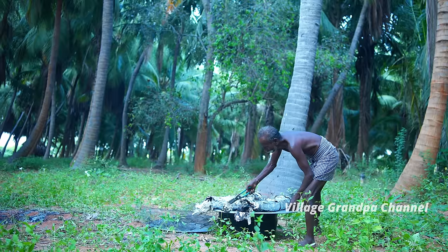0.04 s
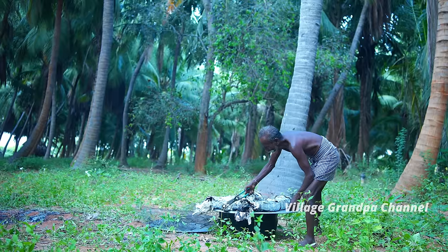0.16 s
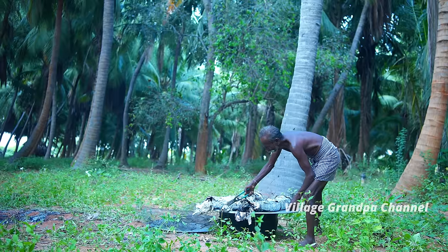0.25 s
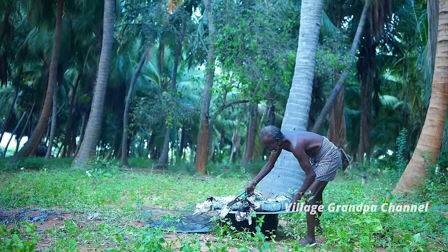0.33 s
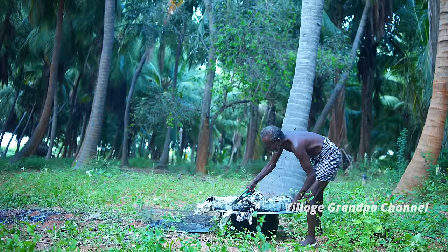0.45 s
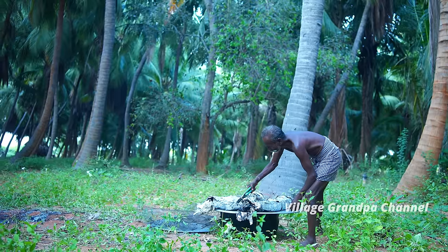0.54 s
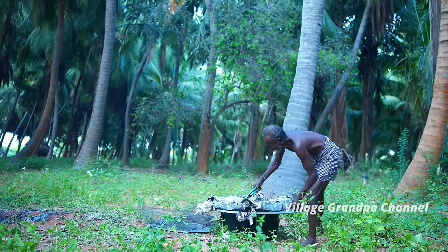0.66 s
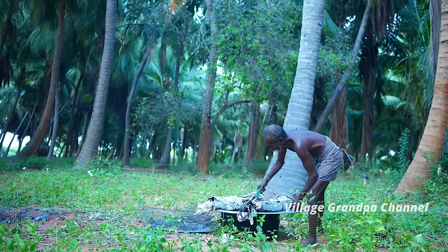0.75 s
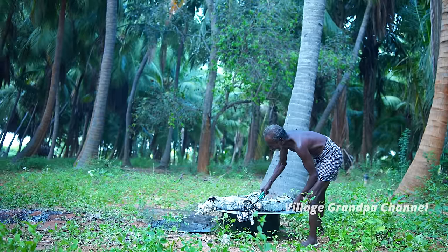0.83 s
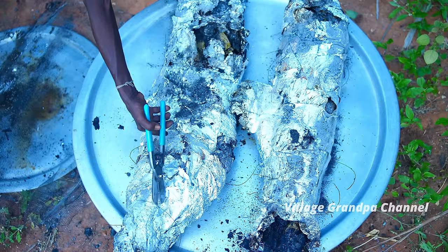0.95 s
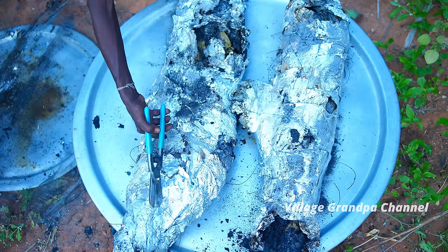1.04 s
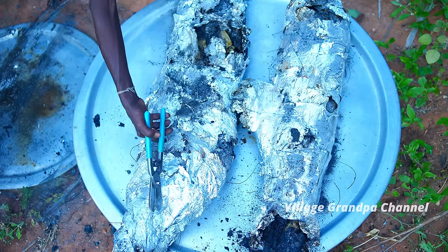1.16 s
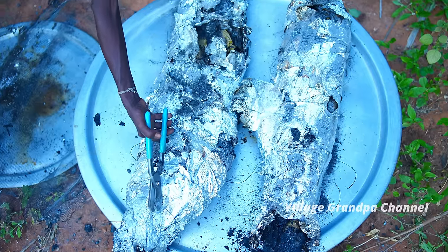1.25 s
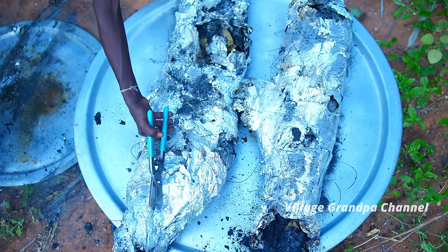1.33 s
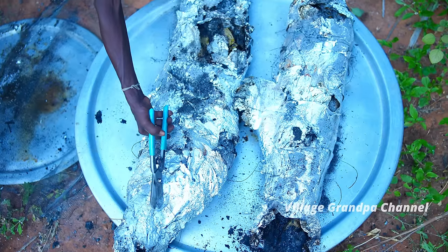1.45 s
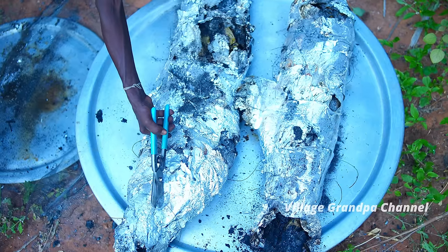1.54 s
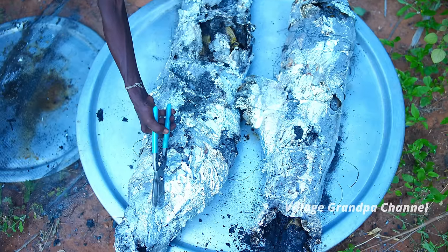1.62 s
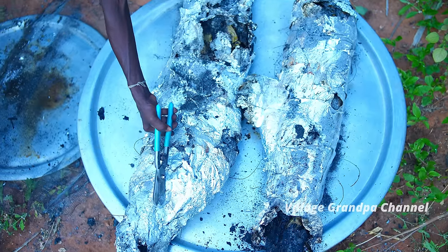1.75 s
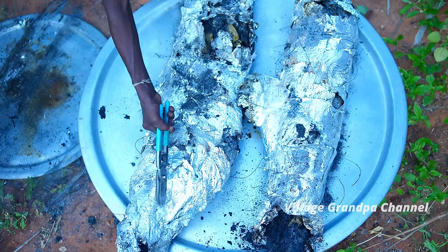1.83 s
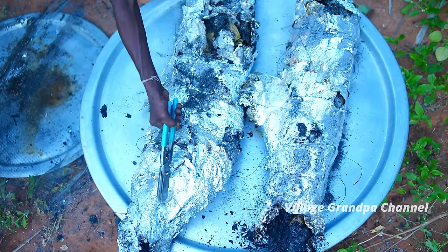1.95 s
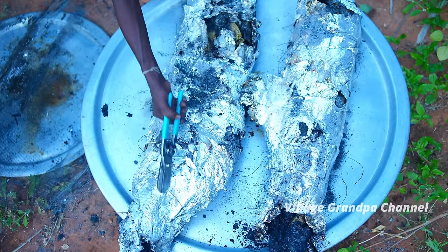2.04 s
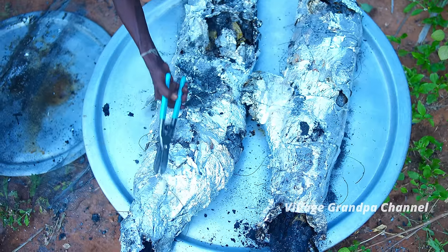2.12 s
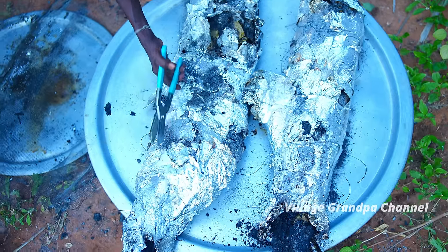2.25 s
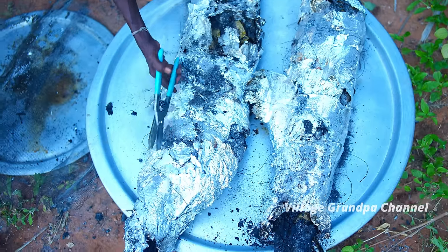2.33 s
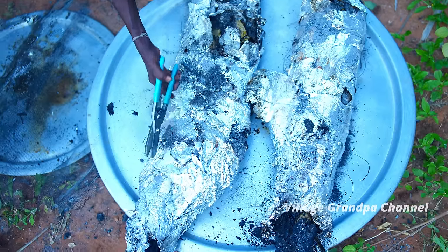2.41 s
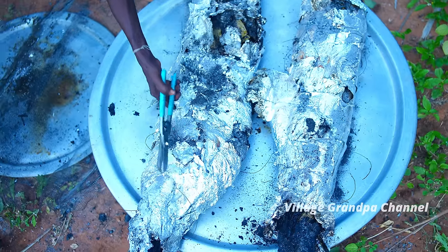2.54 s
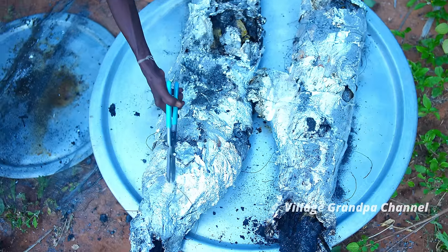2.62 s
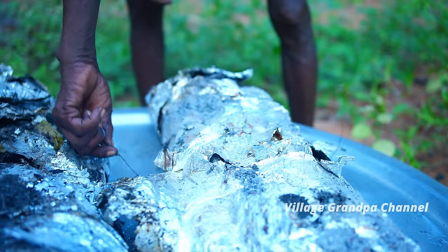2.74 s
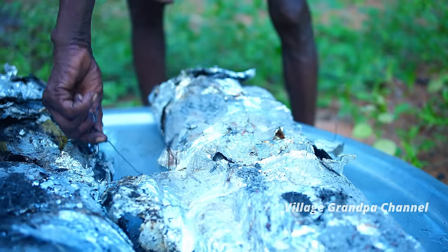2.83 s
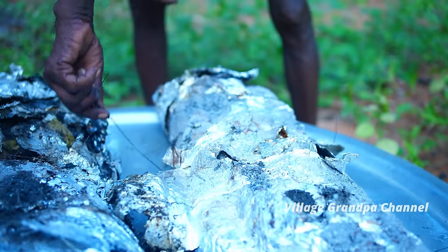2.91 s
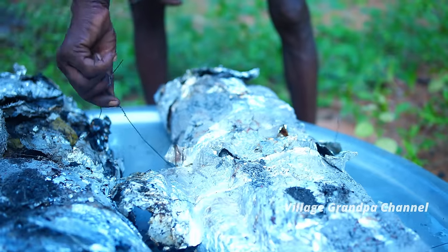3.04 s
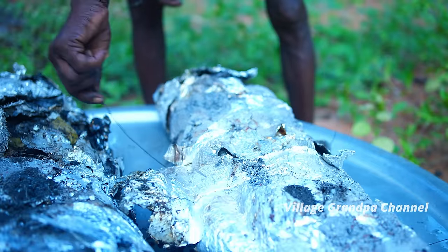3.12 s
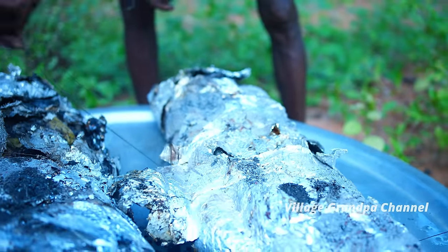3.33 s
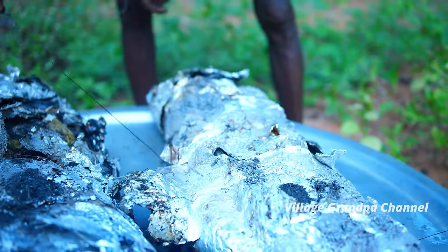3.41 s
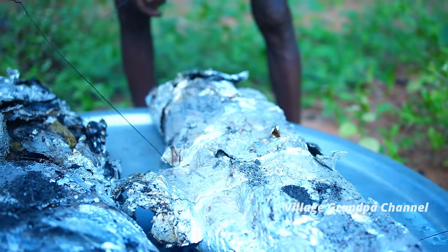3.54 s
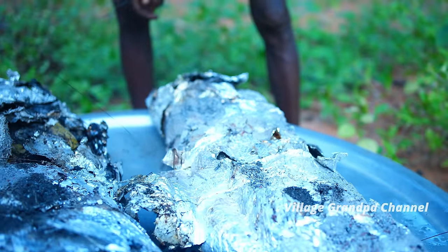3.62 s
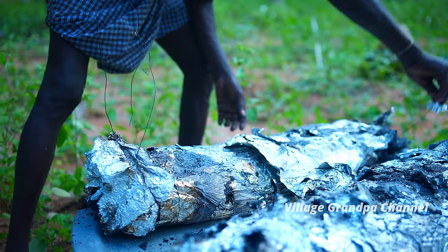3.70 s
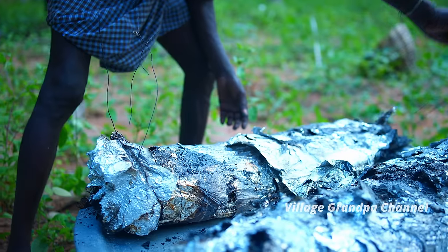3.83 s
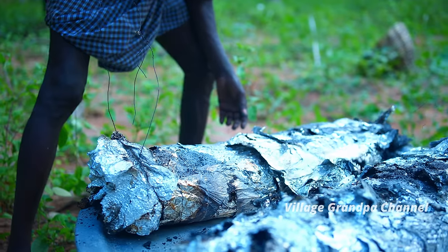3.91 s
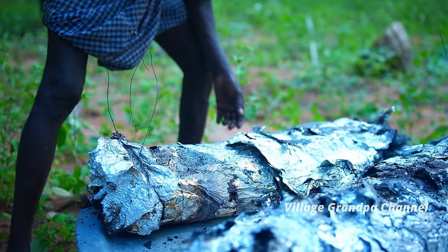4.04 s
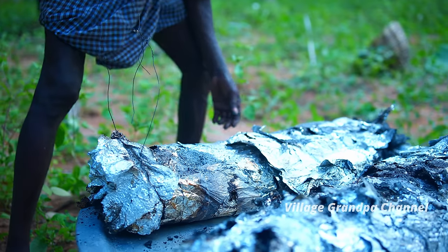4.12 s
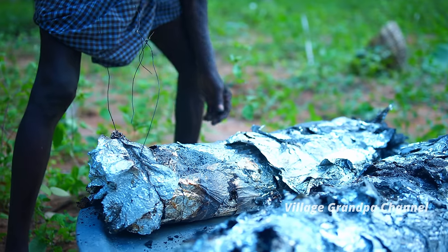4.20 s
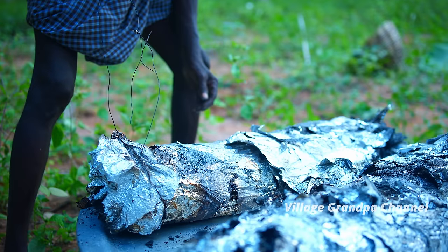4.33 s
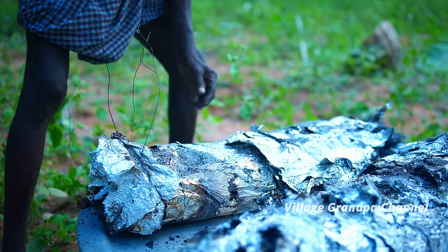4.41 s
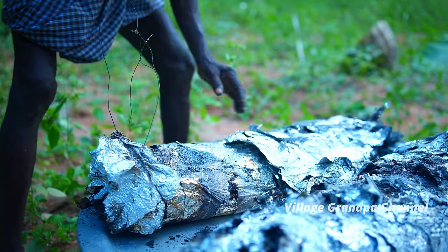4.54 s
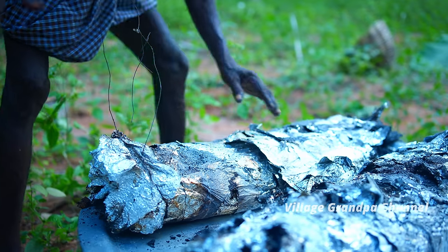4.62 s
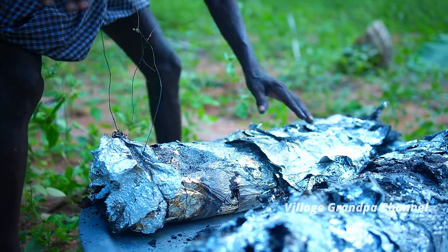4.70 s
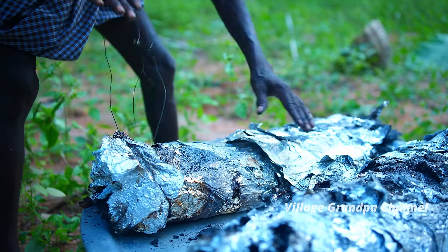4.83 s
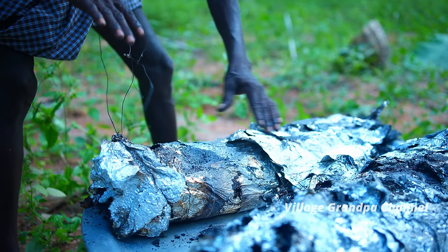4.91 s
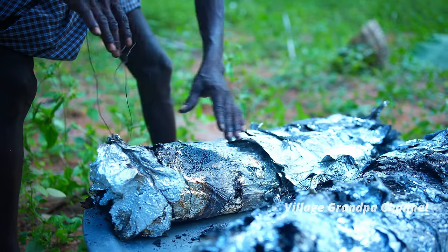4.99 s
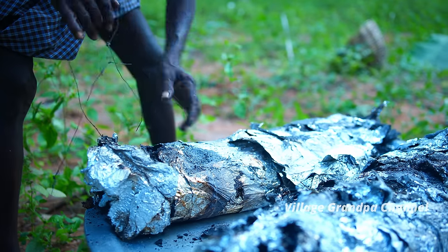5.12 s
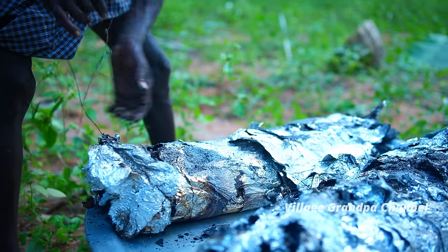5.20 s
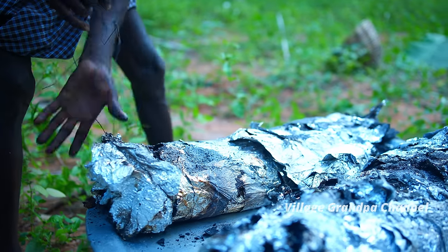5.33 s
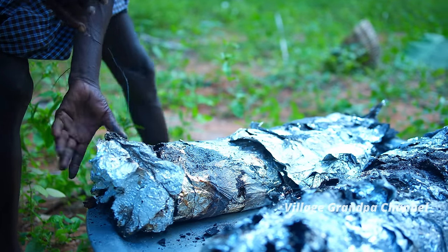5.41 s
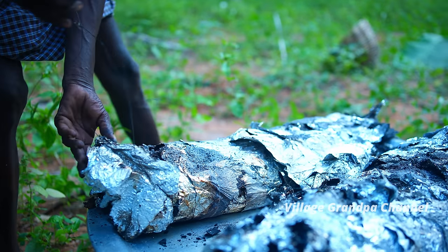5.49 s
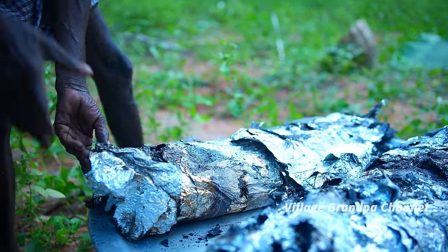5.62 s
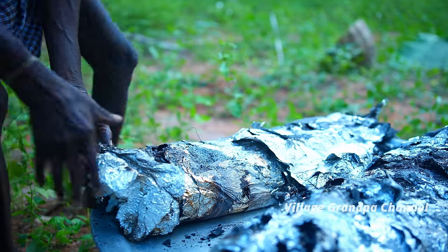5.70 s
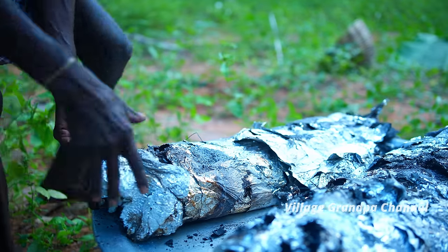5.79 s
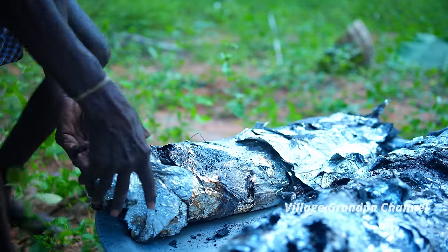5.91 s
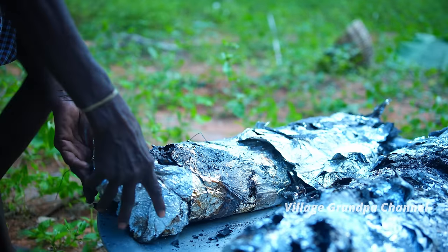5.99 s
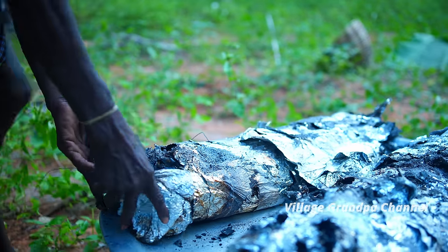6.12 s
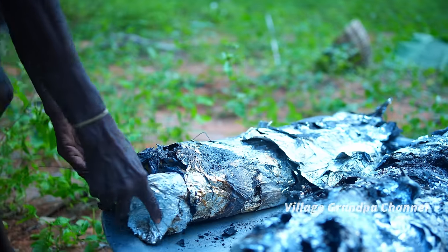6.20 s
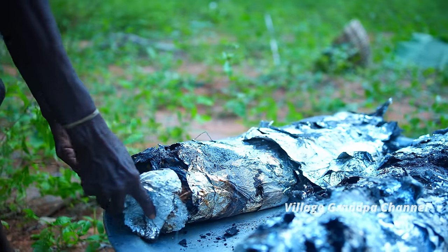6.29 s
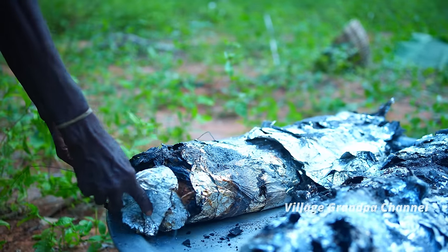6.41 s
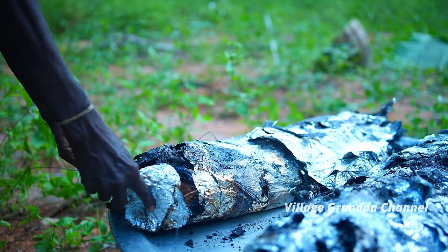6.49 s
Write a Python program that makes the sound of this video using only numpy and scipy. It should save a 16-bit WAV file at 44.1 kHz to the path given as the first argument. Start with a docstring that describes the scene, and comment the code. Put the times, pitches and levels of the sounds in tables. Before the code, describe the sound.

Close, dry outdoor sound with soft wind rumble and faint air hiss. Weak distant foil crackle comes first, then two nearly joined sharp scissor snips through crisp foil and a thin ring of blades. A bright rustle swells as binding is drawn out, the foil is dragged with scuffs and cracks, lightly touched, then peeled with pops and one short tray knock.

```python
"""Unwrapping a foil bundle outdoors

Charred aluminium foil round two roasts on a metal tray is snipped with scissors, unbound and peeled open.
Creases buckle in random click trains that ring small facets; big folds collapse in short bursts of cracks.
Struck blades and tray ring as sums of decaying modes, and scuffs are short bursts of band-passed noise.
Coloured noise makes the light breeze rumbling on the microphone and the faint hiss of the air."""
import sys
import numpy as np
from scipy import signal
from scipy.fft import rfft, irfft, next_fast_len
from scipy.io import wavfile
from scipy.ndimage import uniform_filter1d

SR = 44100
rng = np.random.default_rng(int(sys.argv[2]) if len(sys.argv) > 2 else 0)


def generate_wav(signal):
    """Clip the signal to [-1, 1] and save it as 16-bit WAV at the path in sys.argv[1]."""
    frames = np.transpose(np.atleast_2d(signal))
    scaled = np.clip(frames, -1, 1) * 32767
    pcm = np.round(scaled).astype(np.int16)
    wavfile.write(sys.argv[1], SR, pcm)


N = 288855
TIME = np.arange(N) / SR  # s
BODY_HZ, TOP_HZ = 2200, 8000  # borders between body, middle and top of the foil sound
SILENT_DB = -72  # effort below this makes no foil sound


def undb(db):
    """Amplitude ratio: decibels to gain."""
    return 10 ** (np.asarray(db) / 20)


def unit(x):
    """Normalisation of power: scale to rms 1."""
    return x / np.sqrt(np.mean(x ** 2) + 1e-18)


def add(out, s, x):
    """Superposition: mix x into out from time s, in seconds."""
    i = int(np.clip(s * SR, 0, N - 1))
    out[i:i + len(x)] += x[:N - i]


def band(x, hz, kind, order=4):
    """Band limiting by a Butterworth filter, maximally flat in its passband."""
    return signal.sosfilt(signal.butter(order, hz, kind, fs=SR, output="sos"), x)


def resonate(x, hz, q):
    """Simple resonance: a second-order peak with gain 1 at its centre."""
    b, a = signal.iirpeak(min(hz, .4 * SR), max(q, 1), fs=SR)
    return signal.lfilter(b, a, x)


def colour(x, points):
    """Minimum-phase filtering: a causal response through (hz, db) points, built from the cepstrum."""
    hz, db = np.transpose(points)
    size = 2 * next_fast_len(len(x) // 2 + SR // 10)
    grid = np.maximum(np.fft.rfftfreq(size, 1 / SR), 1)
    # below the lowest point the response falls a further 6 dB per octave
    low_cut_db = 20 * np.log10(np.maximum(hz[0] / grid, 1))
    gain_db = np.interp(np.log(grid), np.log(hz), db) - low_cut_db
    cepstrum = irfft(np.log(undb(gain_db)))
    # folding the cepstrum onto positive time makes the filter causal
    cepstrum[1:size // 2] *= 2
    cepstrum[size // 2 + 1:] = 0
    return irfft(rfft(x, size) * np.exp(rfft(cepstrum)))[:len(x)]


def walk(rate, n=N):
    """Slow random modulation: chance values of rms 1, joined by straight lines, rate per second."""
    knots = rng.standard_normal(N // 20)
    return unit(np.interp(TIME[:n] * rate, np.arange(len(knots)), knots))


def outdoors():
    """Turbulent pressure as modulated low noise, soft bumps as windowed sines, and hiss as shaped noise."""
    # spectrum of the breeze: frequency_hz, gain_db
    breeze_tone = [(15, -17), (28, -1), (48, -3.5), (63, 1.5), (80, -1.5), (100, -3), (130, -10.5),
                   (148, -7), (175, -23.5), (260, -35.5), (500, -55.5)]
    # strength of the breeze on the microphone: time_s, level_db
    breeze = [(0, -50.5), (0.9, -48.5), (2.1, -51), (2.5, -44), (2.9, -51), (3.08, -41), (3.4, -47.5),
              (3.62, -41), (3.8, -51), (4.3, -49), (5.3, -46), (6.55, -51.5)]
    # low bumps at the microphone: start_s, length_s, pitch_hz, level_db
    bumps = [(1.826, 0.027, 71, -26), (3.207, 0.037, 85.5, -32.5), (3.314, 0.025, 80, -33),
             (3.486, 0.057, 40.3, -33)]
    # spectrum of the still air of the grove: frequency_hz, gain_db
    air_tone = [(100, 6), (220, -0.5), (350, -4), (600, -8.5), (1100, -14.5), (2200, -18.5), (4200, -17.5),
                (6000, -20), (9000, -22), (12000, -19.5), (16000, -23.5)]
    air_db, flutter_db, sway_db = -53.5, 4.5, 0.9

    noise = colour(rng.standard_normal(N), breeze_tone)
    rumble = unit(noise * undb(flutter_db * walk(14)))
    s, db = np.transpose(breeze)
    out = rumble * undb(np.interp(TIME, s, db))
    for s, length, hz, db in bumps:
        t = TIME[:int(length * SR)]
        add(out, s, undb(db) * np.hanning(len(t)) * np.sin(2 * np.pi * hz * t))
    hiss = unit(colour(rng.standard_normal(N), air_tone))
    return out + hiss * undb(air_db + sway_db * walk(5.2))


def scuffs():
    """Friction noise through a resonant band: brief rubs excite a hollow under the crust."""
    # start_s, length_s, centre_hz, width_hz, level_db
    rubs = [(3.815, 0.025, 830, 220, -41.5), (3.909, 0.033, 1150, 350, -40), (4.084, 0.039, 1430, 400, -52),
            (4.085, 0.047, 374, 120, -54.5), (4.163, 0.055, 1575, 297, -57), (4.739, 0.029, 760, 240, -49),
            (4.861, 0.054, 1440, 320, -55), (5.05, 0.049, 437, 68, -45), (6.032, 0.048, 823, 272.4, -38.5),
            (6.4, 0.17, 357, 236, -55.5)]
    out = np.zeros(N)
    for s, length, hz, width_hz, db in rubs:
        n = int(length * SR)
        edges_hz = [hz - width_hz / 2, hz + width_hz / 2]
        rub = band(rng.standard_normal(SR // 2), edges_hz, "bandpass", order=2)[-n:]  # filter has settled
        add(out, s, unit(rub * np.hanning(n)) * undb(db))
    return out


def struck(hits, modes, gain_db, damping, split, buzz_db, buzz_t60):
    """Modal synthesis: blows ring clusters of close, beating modes, and metal chatter adds a diffuse buzz."""
    out, t = np.zeros(N), TIME[:SR // 2]
    # three close partials for every mode
    hz, mode_db, t60 = np.repeat(np.transpose(modes), 3, axis=1)[:, :, None]
    hz = hz + split * np.sqrt(hz) * rng.standard_normal(hz.shape)
    for s, db, tilt_db in hits:
        scatter_db = rng.standard_normal(hz.shape)
        shares = undb(mode_db + tilt_db * np.log2(hz / hz.max()) + scatter_db)
        decay = np.exp(-np.log(1000) * damping * t / t60)
        rings = np.sin(2 * np.pi * (hz * t + rng.random(hz.shape))) * decay
        ringing = (shares * rings).sum(axis=0) / np.linalg.norm(shares)
        chatter = rng.standard_normal(len(t))
        buzz = unit(sum(g * resonate(chatter, f, q=8.2) for f, g in zip(hz[::3, 0], shares[::3, 0])))
        buzz *= undb(buzz_db) * np.exp(-np.log(1000) * t / buzz_t60)
        add(out, s, undb(db + gain_db) * (ringing + buzz))
    return out


def tray():
    """Impact excitation of plate modes: the stiff crust knocks on the tray and rebounds."""
    # blows before the common gain: start_s, level_db, tilt_db_per_octave
    hits = [(5.7705, -17, 2.5), (5.7735, -25.5, 5), (5.795, -30, -17), (5.811, -37, -14)]
    # modes before splitting and added damping: frequency_hz, level_db, t60_s
    modes = [(1060, -22, 0.12), (1325, 0, 0.094), (1510, -2.5, 0.24), (1910, 6.5, 0.11), (2153, 1, 0.15),
             (2430, 2, 0.082), (2825, 5, 0.12), (3065, -0.5, 0.16), (3350, -17, .14), (5570, -2, .15),
             (6730, 1, 0.15), (7950, -3, 0.11), (7500, -7, 0.097)]
    return struck(hits, modes, gain_db=-2, damping=1.25, split=.12, buzz_db=-3, buzz_t60=.06)


def scissors():
    """Impact excitation of bar modes: the steel blades ring as they spring open."""
    # blows before the common gain: start_s, level_db, tilt_db_per_octave
    hits = [(2.2195, -39.5, -1), (2.2325, -57, 3)]
    # modes before splitting and added damping: frequency_hz, level_db, t60_s
    modes = [(2000, -16, 0.4), (2020, 11, 0.14), (3350, -1, 0.28), (3840, 6, .3), (5740, -12, 0.27),
             (6300, -5, .3), (7750, 2, .35), (8650, 2, 0.28), (10300, 1, 0.34), (11250, -5, .3),
             (12030, -7, .25), (12470, -2, 0.41), (13380, 0, .15), (13535, 0, .45), (13995, 1, .25),
             (14900, -1, 0.41)]
    return struck(hits, modes, gain_db=-5, damping=1.05, split=.22, buzz_db=2.5, buzz_t60=.45)


def blade_tips():
    """Local excitation of high modes: the blade tips touch and ring faintly."""
    # touches before the common gain: start_s, level_db, tilt_db_per_octave
    hits = [(2.5405, -53, 0)]
    # modes before splitting: frequency_hz, level_db, t60_s
    modes = [(13500, 0, 0.29), (14900, -4, .3)]
    return struck(hits, modes, gain_db=2, damping=1, split=0.17, buzz_db=-12, buzz_t60=0.034)


def facet(ring_s, hz, q, mode_db, tail_db, tail_s):
    """Impulse response of a foil patch: a main mode among crowded, short-lived ones, then a faint shiver."""
    t = TIME[:SR // 20]
    decay = np.exp(-t / ring_s) + undb(tail_db) * np.exp(-t / tail_s)
    crowd = rng.standard_normal(len(t)) * decay
    response = unit(crowd) + undb(mode_db) * unit(resonate(crowd, hz, q))
    return response / np.linalg.norm(response)


def effort(movement):
    """Incoherent addition: overlapping strokes of one movement add in power; gives level and body in dB."""
    # strokes of hand, blade or thread, before the movement's gains; level is that above 2.2 kHz:
    # peak_s, rise_s, fall_s, level_db, relative_body_db, movement
    strokes = [(0.01, .03, 0.099, -53.5, -7, "distant"), (0.41, 0.091, 0.06, -47.5, -11, "distant"),
               (0.488, 0.032, 0.028, -42, -14.5, "distant"), (0.653, 0.23, 0.22, -56.5, -5, "distant"),
               (1.05, 0.038, 0.084, -57, -1.5, "blade in"), (1.169, 0.058, 0.061, -46, -10, "blade in"),
               (1.914, 0.027, 0.073, -36.5, -12.5, "cut"), (2.024, 0.082, 0.051, -38.5, -16.5, "cut"),
               (2.7, 0.0021, 0.16, -40, -11, "loosen"), (2.874, 0.11, 0.1, -36, -9.5, "loosen"),
               (2.976, 0.034, 0.062, -43.5, -5, "loosen"), (3.265, 0.12, 0.078, -31, -13, "draw"),
               (3.354, 0.062, 0.028, -30.5, -17, "draw"), (3.409, 0.045, 0.06, -41.5, -9.5, "draw"),
               (3.532, 0.045, 0.039, -48.5, -11.5, "draw"), (3.678, 0.039, 0.036, -33.5, -9, "drag"),
               (3.84, 0.18, 0.082, -33.5, -5.5, "drag"), (3.96, 0.034, 0.022, -34.5, -3, "drag"),
               (4.041, 0.084, .15, -46.5, -3, "drag"), (4.231, .018, 0.076, -40, -20, "touch"),
               (4.43, 0.069, 0.19, -48.5, -22, "touch"), (4.65, 0.037, 0.064, -45.5, -11, "touch"),
               (4.742, 0.037, 0.088, -49.5, -4, "touch"), (4.961, 0.18, 0.3, -52.5, -2.5, "touch"),
               (5.165, 0.13, 0.075, -46, -11.5, "touch"), (5.482, 0.012, 0.079, -47, 1, "peel"),
               (5.613, 0.1, 0.17, -42.5, -2.5, "peel"), (5.786, 0.035, 0.038, -36.5, -0.5, "peel"),
               (5.875, 0.055, 0.096, -43, -9, "peel"), (6.123, 0.13, 0.091, -38.5, -10.5, "peel"),
               (6.202, 0.039, 0.091, -36, -4.5, "peel"), (6.406, 0.22, 0.26, -41, -11, "peel")]
    drop_db = 10  # fall in level one rise or fall length away from the peak
    rise_shape, fall_shape = 1.6, 1.3  # 1 = pointed peak, 2 = rounded

    power, body = np.full(N, 1e-14), np.full(N, 1e-15)
    for s, rise, fall, db, body_db, name in strokes:
        if name == movement:
            before = np.maximum((s - TIME) / rise, 0) ** rise_shape
            after = np.maximum((TIME - s) / fall, 0) ** fall_shape
            stroke = undb(db - drop_db * np.minimum(before + after, 20)) ** 2
            power += stroke
            body += stroke * undb(body_db) ** 2
    return 10 * np.log10(power), 10 * np.log10(body / power)


def snap(length, db, low_db, high_db, hz):
    """Avalanche of buckling: a sharp crack and a short run of cracks of random size ring the same facet."""
    rate, first, fade = 7000, 0.83, 0.16  # cracks per second, size of the first, slight decay exponent
    n = max(int(length * SR), 8)
    cracks = (rng.random(n) < rate / SR) * rng.standard_normal(n)
    cracks[0] = first
    response = facet(ring_s=0.00025, hz=hz, q=10, mode_db=-4, tail_db=-23, tail_s=.009)
    burst = signal.fftconvolve(cracks * np.exp(-fade * np.arange(n) / n), response)
    body = band(band(burst, BODY_HZ, "lowpass"), 550, "highpass", order=2)
    middle = band(burst, [BODY_HZ, TOP_HZ], "bandpass")
    top = band(burst, TOP_HZ, "highpass")
    parts = [(body, low_db), (middle, -2.0), (top, high_db - 0.5)]
    # each band carries the energy of its level held for the snap's length
    return sum(part * np.sqrt(n) / np.linalg.norm(part) * undb(db + part_db) for part, part_db in parts)


def small_folds(movement, per_s, over_db, top_db):
    """Random point process: small folds of any size give way near the level of the crinkle around them."""
    length_s, scatter_db, count = .0025, 6.5, 160  # count = candidate folds
    out = np.zeros(N)
    work_db, low_db = effort(movement)
    for when, chance, size, pitch in rng.random((count, 4)):
        i = int(when * N)
        if work_db[i] > SILENT_DB and chance < per_s * N / SR / count:
            db = work_db[i] + over_db + scatter_db * (2 * size - 1)
            hz = 1000 * 13 ** pitch
            add(out, i / SR, snap(length_s, db, low_db[i], top_db, hz))
    return out


def snaps():
    """Sudden release of strain: big folds and blade cuts, with small folds while the foil is handled."""
    # level is that of the 2.2-8 kHz band, before the band trims; body and top are relative to it:
    # start_s, length_s, level_db, body_db, top_db, facet_mode_hz
    big_folds = [(0.176, 0.003, -54.5, -6, 7, 14400), (0.283, 0.0068, -56.5, -10, 12.5, 11600),
                 (0.44, 0.005, -49, -15, 8, 13400), (0.65, 0.0038, -49, -19, 4, 2850),
                 (0.919, 0.018, -51, -8.5, 8, 13900), (1.421, 0.0019, -48.5, -2, -15, 3820),
                 (1.8723, 0.0034, -14, -16.5, 2, 4700), (1.8807, 0.004, -15.5, -21, -2.5, 6750),
                 (1.889, 0.0063, -27.5, -10.5, -16, 6900), (1.907, 0.00087, -22.5, -7, -14, 5370),
                 (1.911, 0.01, -30.5, -10, 8, 13500), (2.2181, 0.006, -32.5, -3.5, 8, 2270),
                 (2.221, 0.014, -33.5, -11.5, 8.5, 13300), (2.818, 0.0032, -33, -2.5, -14, 1120),
                 (2.8888, 0.0018, -15, -7.5, 0, 1230), (2.919, 0.0087, -31, -8, 2, 12400),
                 (3.004, 0.002, -43.5, -15, 6, 11000), (3.514, 0.005, -40, -24, 2.5, 10600),
                 (3.673, 0.0048, -26, -10, -20, 1940), (3.9044, 0.0038, -26.5, -8, 5.5, 4570),
                 (3.913, 0.01, -30, -7, 5.5, 7960), (4.037, 0.0022, -44, 1, 5, 7450),
                 (4.176, 0.015, -43.5, -25, -3, 1500), (4.208, 0.0046, -37.5, -27, -14, 4800),
                 (4.429, 0.016, -41, -19, 3, 4360), (4.499, 0.003, -43, -15, -2, 8450),
                 (4.628, 0.0044, -53.5, -5, 13, 11700), (4.95, 0.006, -38.5, -15, -3, 4300),
                 (5.04, 0.0029, -27, -19, -10, 6900), (5.476, 0.0051, -32, -8.5, -4.5, 3720),
                 (5.525, 0.0031, -33.5, -1.5, -4, 1050), (5.5483, 0.0015, -22.5, -6, -1, 4700),
                 (5.589, 0.0025, -36, -24, 5, 4200), (5.5955, 0.0015, -47, -13, 18, 14200),
                 (5.616, 0.011, -27, -10, -1, 3930), (5.77, 0.0033, -24.5, -24, 11, 10800),
                 (5.773, 0.0019, -19.5, -29, -12, 2700), (5.783, 0.0028, -24.5, -18, -20, 7650),
                 (5.7937, 0.0064, -28, -12, 5, 1850), (5.808, 0.012, -28.5, -19, -6, 1820),
                 (6.079, 0.0018, -43, -2, 11.5, 12000), (6.2565, 0.0032, -34, -3, -11, 1060),
                 (6.393, 0.0084, -37, -20, 5, 4800), (6.433, 0.0082, -38, -2.5, 2, 1990),
                 (6.476, 0.0004, -37, -18, 6, 7560)]
    out = np.zeros(N)
    for s, length, db, low_db, high_db, hz in big_folds:
        add(out, s, snap(length, db, low_db, high_db, hz))
    return (out + small_folds("distant", per_s=8, over_db=-4, top_db=6)
            + small_folds("drag", per_s=12, over_db=0.5, top_db=5)
            + small_folds("touch", per_s=5, over_db=0, top_db=2)
            + small_folds("peel", per_s=14, over_db=-2.5, top_db=8))


def crinkle(movement, tone, rate, spread_db, gain_db, body_db):
    """Crackling noise: creases buckle at random on many facets, more often the harder the foil is worked."""
    count = 14  # groups of facets
    strain_db, clump_db = -1.0, 1.57  # wander of each group, and of the whole sheet
    work_db, low_db = effort(movement)
    start, end = np.flatnonzero(work_db > SILENT_DB)[[0, -1]]
    n, work_db, low_db = end - start, work_db[start:end], low_db[start:end]
    # clicks per sample in one group; rate is clicks per second in all groups at the hardest effort
    density = rate * np.sqrt(undb(work_db - work_db.max())) / count / SR
    sheet = np.zeros(n)
    for hz in np.linspace(1000, 14500, count) + rng.uniform(-400, 620, count):
        chance, size, sign = rng.random((3, n))
        size_db = spread_db * np.minimum(-np.log1p(-size), 4)
        sizes = undb(size_db) * np.sign(sign - .5)
        clicks = (chance < density) * sizes / np.sqrt(density)
        clicks *= undb(strain_db * walk(17.1, n))
        response = facet(ring_s=0.00092, hz=hz, q=hz / 700, mode_db=-2, tail_db=-14, tail_s=.009)
        sheet += signal.oaconvolve(clicks, response)[:n]
    sheet = colour(sheet * undb(clump_db * walk(130, n)), tone)
    # the hand feeds in energy steadily, however it is shared among the clicks
    sheet /= np.sqrt(np.maximum(uniform_filter1d(sheet ** 2, SR // 20), 1e-12))
    edge = unit(band(sheet, BODY_HZ, "highpass"))
    body = unit(band(sheet, BODY_HZ, "lowpass")) * undb(low_db + body_db)
    out = np.zeros(N)
    add(out, start / SR, (edge + body) * undb(work_db + gain_db))
    return out


def foil():
    """Buckling of a thin sheet: each kind of movement has its own click rate, size spread and colour."""
    # colour of each movement: frequency_hz, gain_db
    distant_tone = [(400, 6), (2000, -4), (2800, -1), (4000, -11.5), (5100, -0.5), (5800, -7), (6300, -0.5),
                    (8500, -3), (10200, -6.5), (11600, 0.5), (12500, -11), (13500, 3), (16000, -4)]
    blade_in_tone = [(400, -12), (2100, -16.5), (2700, -0.5), (4300, -3), (5600, -9), (7500, -2),
                     (10000, -9), (16000, -7)]
    cut_tone = [(300, -2.5), (1000, -4), (3700, -7), (5000, -3.5), (7500, -1.5), (11000, -4.5), (13500, -1),
                (16000, -1)]
    loosen_tone = [(250, -18.5), (550, -5.5), (1200, -8.5), (2900, -7), (3700, -3), (4900, 2.5), (6800, 0),
                   (10400, 0), (11200, 3), (12300, 1), (13700, 1.5), (16000, -0.5)]
    draw_tone = [(300, -22), (1150, -9), (2200, -10), (4150, 1.5), (5900, 2.5), (6600, 4), (7400, -1.5),
                 (8900, 2), (10400, 0), (11500, 2.5), (12600, 0), (13400, 0), (16000, 2)]
    drag_tone = [(250, 8), (500, 5), (1100, 8.5), (2000, 2.5), (3000, -3), (4600, 3), (6600, -1.5),
                 (8600, -0.5), (10600, -4), (11900, -1.5), (13100, -1.5), (14300, 1), (16000, -3.5)]
    touch_tone = [(300, -14), (800, -1), (1100, -8), (1600, -3.5), (3100, -1), (4800, 3), (5700, 0),
                  (6500, -11), (8000, -1), (10200, -1.5), (12500, -5), (16000, -5)]
    peel_tone = [(250, 0.5), (550, 1.5), (1100, 12), (2200, -2.5), (3800, -4), (4900, -1), (6300, -4),
                 (10000, -4.5), (11300, -4), (12900, -8), (13600, -4), (16000, -7)]
    return (crinkle("distant", distant_tone, rate=2100, spread_db=-0.5, gain_db=1.5, body_db=-4.5)
            + crinkle("blade in", blade_in_tone, rate=5700, spread_db=2, gain_db=-1.5, body_db=1.5)
            + crinkle("cut", cut_tone, rate=4300, spread_db=1.0, gain_db=1, body_db=1)
            + crinkle("loosen", loosen_tone, rate=3600, spread_db=2.0, gain_db=0.5, body_db=0.5)
            + crinkle("draw", draw_tone, rate=5500, spread_db=1.0, gain_db=-1, body_db=3.5)
            + crinkle("drag", drag_tone, rate=3600, spread_db=1.5, gain_db=0.0, body_db=-4)
            + crinkle("touch", touch_tone, rate=3200, spread_db=0.5, gain_db=-0.5, body_db=-3)
            + crinkle("peel", peel_tone, rate=2200, spread_db=2.0, gain_db=2.0, body_db=-3.5))


def scene():
    """Superposition in a free field: all sources add in the open air, with no room around them."""
    background = outdoors()
    metal = tray() + scissors() + blade_tips()
    bundle = scuffs() + snaps() + foil()
    return (background + metal + bundle)[None]


def record(dry):
    """Band limiting: a steep elliptic low-pass at 15.8 kHz cuts the very top."""
    return signal.sosfilt(signal.ellip(10, .2, 70, 15800, fs=SR, output="sos"), dry)


dry = scene()
out = record(dry)
generate_wav(out)
```